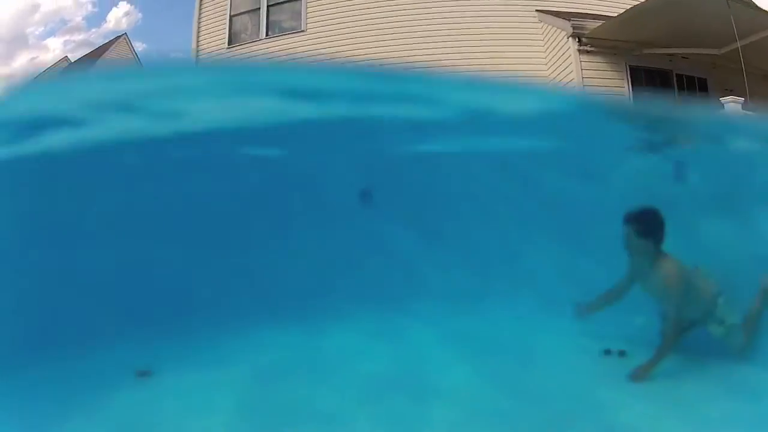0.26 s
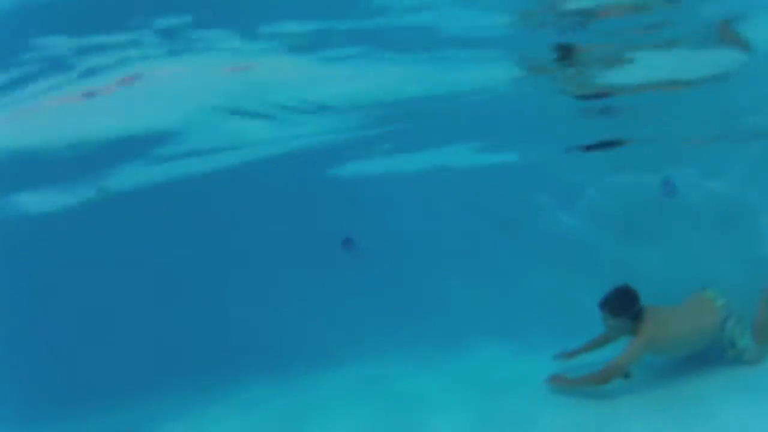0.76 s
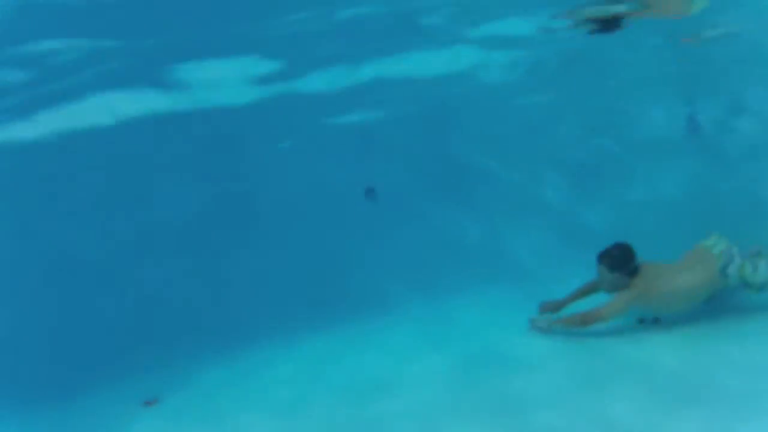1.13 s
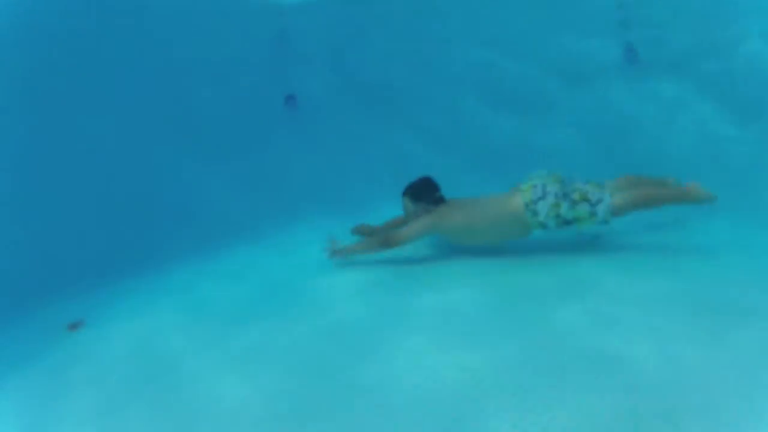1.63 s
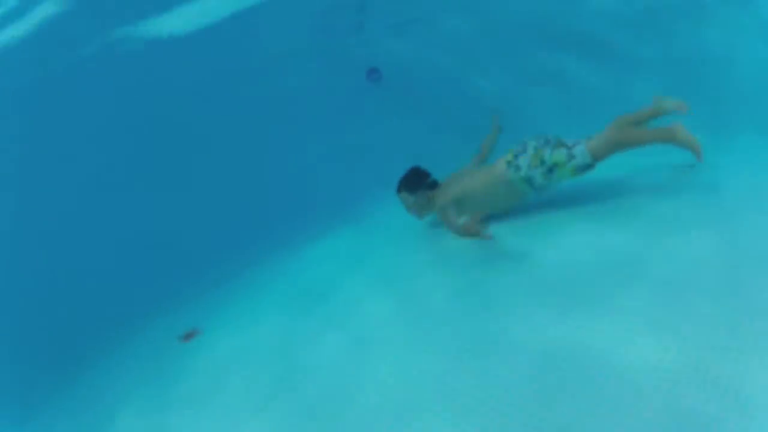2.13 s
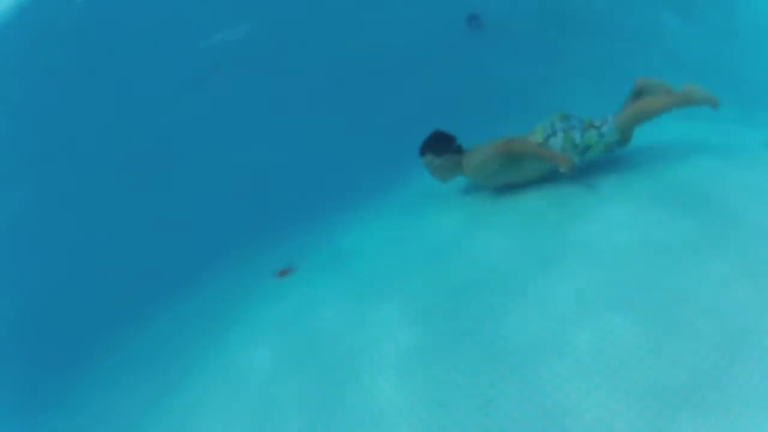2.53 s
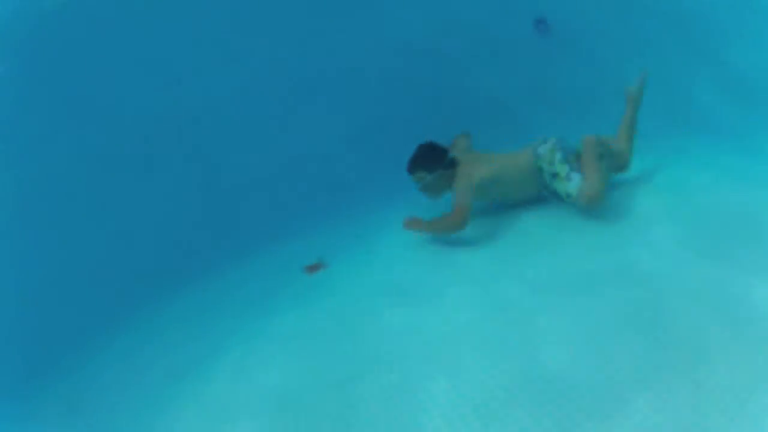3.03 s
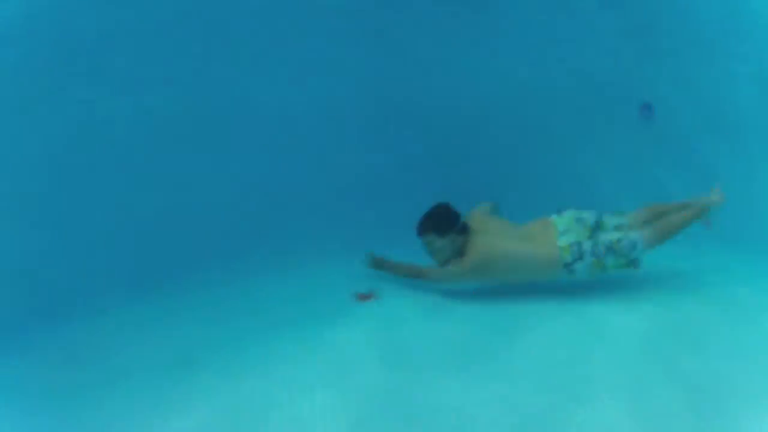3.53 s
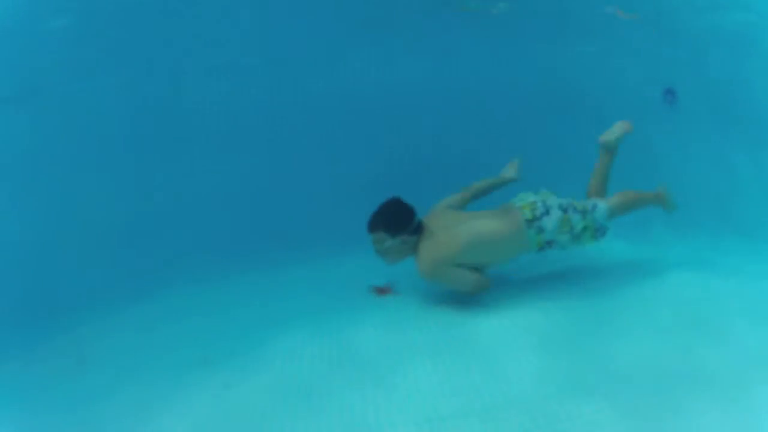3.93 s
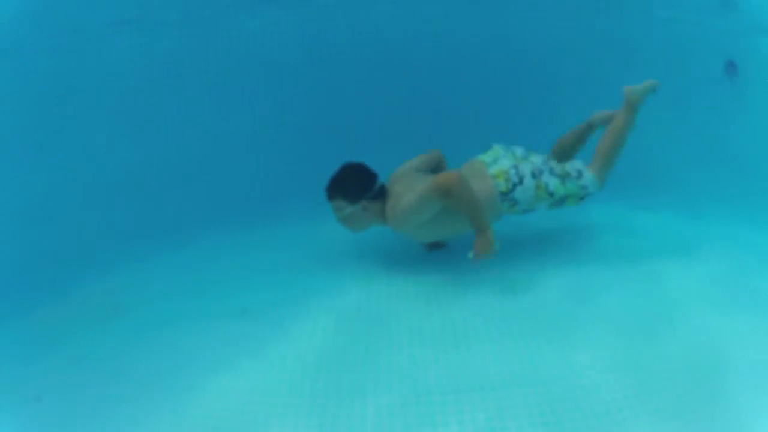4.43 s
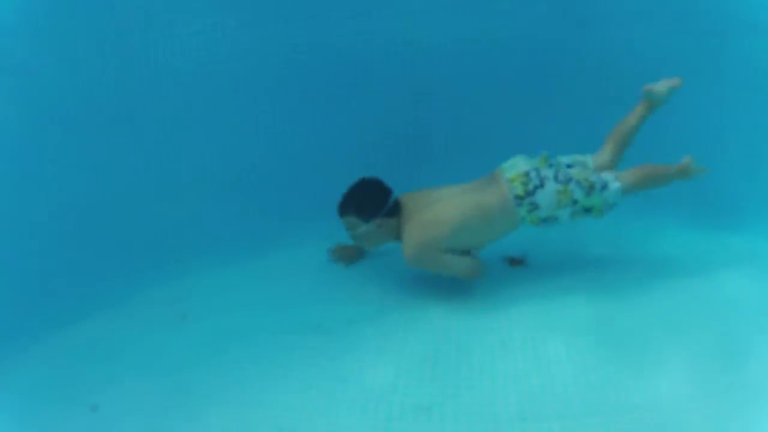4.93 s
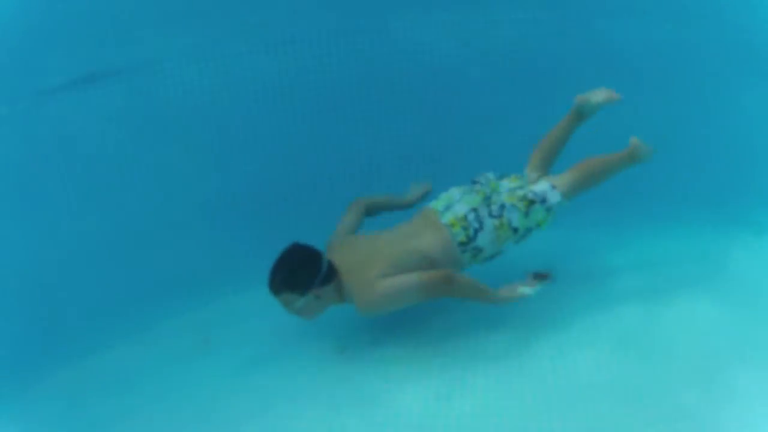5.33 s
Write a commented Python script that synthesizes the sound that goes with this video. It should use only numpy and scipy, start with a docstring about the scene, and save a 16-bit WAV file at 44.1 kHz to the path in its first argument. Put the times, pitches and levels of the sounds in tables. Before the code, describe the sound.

A brief, sharp slosh and gurgle of going under, followed by quiet, muffled pool water with soft fizzing and scattered ticks.

```python
"""Water slaps a sealed camera housing as it dips into a garden pool; trapped air gulps out and waves
thump the wall. Once under, far bubbles arrive faint, and swimmers' splashes and churned water ring the
housing, all with a short pool echo, over a low surge and a steady hush. Each sample is held as a step
at 12 kHz, so mirror images of the sound fill the treble."""
import sys
import numpy as np
from scipy import signal
from scipy.fft import rfft, irfft
from scipy.io import wavfile
from scipy.ndimage import uniform_filter1d

SR = 44100
rng = np.random.default_rng(int(sys.argv[2]) if len(sys.argv) > 2 else 0)


def to_wav(s):
    """Save 16-bit WAV."""
    ch = np.atleast_2d(s).T  # columns
    pcm = np.round(np.clip(ch, -1, 1) * 32767)  # PCM
    wavfile.write(sys.argv[1], SR, pcm.astype(np.int16))


N = 246078


def undb(db):
    return 10 ** (np.asarray(db) / 20)


def unit(x):
    return x / np.sqrt(np.mean(x ** 2))


def fade(t, t60_s):
    return np.exp(-np.log(1000) * t / max(t60_s, .002))


def band(x, hz, width_hz):
    """One resonance, gain 1 at its centre."""
    return signal.lfilter(*signal.iirpeak(hz, hz / width_hz, fs=SR), x)


def add(out, start_s, x):
    i = int(start_s * SR)
    out[i:i + len(x)] += x[:N - i]


def wander(samples):
    """Twice-smoothed noise, RMS 1."""
    return unit(uniform_filter1d(uniform_filter1d(rng.standard_normal(N), samples), samples))


def slaps(relative_width=0.22, attack_s=0.00086, t60_s=.013):
    """Water hits the housing: short dry cracks of band noise."""
    # hits: t/s, level/dB, centre f/Hz
    hits = [(0.0895, -30.5, 2300), (0.1041, -21, 1670), (0.1173, -20.5, 2030), (0.13, -24.5, 1760),
            (0.1445, -19, 2760), (0.159, -28, 3580), (0.2127, -41, 3260), (0.227, -36, 2230),
            (0.272, -35, 2460), (0.2904, -22.5, 2330), (0.4016, -21.5, 1820), (0.434, -35.5, 1830),
            (0.4703, -36, 1550), (0.5507, -27, 1500), (0.556, -4.5, 1390), (0.567, -25.5, 1640),
            (0.6146, -37, 2220), (0.6444, -19, 1410), (0.6805, -41, 1550), (0.705, -29.5, 2360),
            (0.7095, 2.5, 2570), (0.724, -16, 1995), (0.7376, -15.5, 5250), (0.7407, 4, 5247),
            (0.755, -11.5, 2100), (0.7594, -19.5, 2600), (0.7787, -4, 1730), (0.783, -9, 2030),
            (0.7908, -9, 1960), (0.801, -23.5, 1980), (0.8164, -25, 1500), (0.878, -20, 1440)]
    out, t = np.zeros(N), np.arange(2000) / SR
    for s, db, hz in hits:
        crack = unit(band(rng.standard_normal(len(t)), hz, relative_width * hz))
        add(out, s, undb(db) * crack * fade(t, t60_s) * np.minimum(t / attack_s, 1))
    return out


def bubble(hz, t60_s, rise_s, glide=0.013):
    """A tone that swells, dies away and climbs a little as the bubble rises."""
    t = np.arange(int((t60_s + rise_s) * SR)) / SR
    swell = np.sin(np.pi / 2 * np.minimum(t / rise_s, 1)) ** 2
    tone = np.sin(2 * np.pi * hz * t * (1 + glide * t / t60_s))
    return tone * swell * fade(np.maximum(t - rise_s, 0), t60_s)


def bubbles(under_s=.95, near_rise_cycles=1.3, octave_db=-22, far_rise_s=0.0029, waver_s=0.0039):
    """Air pinches off: sharp near bubbles in the dip, then soft far clusters, small ones most blurred."""
    # pinch-offs: t/s, level/dB, f/Hz, t60/s
    pinch_offs = [(0.085, -41.5, 2170, 0.14), (0.108, 1.5, 696, 0.018), (0.118, -28, 576, 0.073),
                  (0.13, -25, 2000, 0.016), (0.145, -41, 2800, 0.0093), (0.147, -25, 1680, 0.0065),
                  (0.159, -20, 2920, 0.0059), (0.16, -14.5, 3740, 0.011), (0.226, -14, 603, 0.015),
                  (0.264, -34, 430, 0.0072), (0.2944, -19, 2340, 0.0099), (0.3635, -42, 2450, 0.036),
                  (0.379, -34.5, 764, 0.14), (0.401, -25.5, 620, 0.016), (0.399, -11.5, 2000, 0.0028),
                  (0.4375, -48, 746, 0.28), (0.482, -31, 696, 0.055), (0.524, -42, 1080, 0.04),
                  (0.558, 2.5, 1310, 0.0024), (0.568, -27.5, 506, 0.045), (0.558, -1.5, 541, 0.013),
                  (0.6443, -8, 721, 0.07), (0.6469, -1, 1463, 0.017), (0.697, -21, 705, 0.024),
                  (0.71, 0, 2560, 0.0067), (0.7077, -23, 1620, 0.012), (0.717, -22, 688, 0.043),
                  (0.724, -13.5, 1695, 0.018), (0.723, -10, 2200, 0.018), (0.738, -19, 1344, 0.024),
                  (0.737, -22, 550, 0.011), (0.7536, -17, 3836, 0.011), (0.754, -16.5, 2126, 0.033),
                  (0.768, -15.5, 674, 0.032), (0.771, -11, 2680, 0.015), (0.787, -14, 1914, 0.021),
                  (0.789, -10, 1290, 0.033), (0.7908, -8.5, 558, 0.028), (0.792, -8, 3900, 0.011),
                  (0.82, -6.5, 1300, 0.015), (0.838, -37.5, 1900, 0.034), (0.879, -31, 2440, 0.0086),
                  (0.8875, -23, 1310, 0.04), (1.016, -35.5, 1815, 0.0094), (1.0141, -34.5, 1050, 0.0097),
                  (1.065, -36.5, 1060, 0.0057), (1.12, -40, 2005, 0.06), (1.1868, -44, 1330, 0.025),
                  (1.358, -48, 1190, 0.059), (1.41, -36.5, 1347, 0.0085), (1.448, -45, 2860, 0.011),
                  (1.474, -46, 2090, 0.01), (1.5587, -37.5, 2530, 0.011), (1.661, -48, 2576, 0.029),
                  (1.784, -47.5, 1954, 0.031), (1.962, -35, 3316, 0.0085), (1.965, -36, 1130, 0.031),
                  (2.03, -48.5, 2850, 0.016), (2.06, -39.5, 1087, 0.065), (2.0733, -37, 1060, 0.049),
                  (2.206, -45.5, 1990, 0.012), (2.2075, -41, 3640, 0.014), (2.234, -44, 1820, 0.05),
                  (2.237, -37, 2994, 0.033), (2.239, -30.5, 1070, 0.037), (2.434, -47, 1050, 0.026),
                  (2.44, -46.5, 3910, 0.03), (2.518, -48.5, 1058, 0.04), (2.5641, -44.5, 3490, 0.03),
                  (2.74, -46.5, 3230, 0.042), (2.835, -51, 3070, 0.024), (2.964, -46.5, 1344, 0.01),
                  (3.0492, -51, 3530, 0.045), (3.094, -49, 1960, 0.03), (3.1987, -35, 3560, 0.01),
                  (3.2182, -45.5, 945, 0.018), (3.331, -46, 3910, 0.01), (3.365, -40.5, 3690, 0.0098),
                  (3.4168, -38, 3560, 0.038), (3.432, -34, 3990, 0.012), (3.45, -40.5, 970, 0.016),
                  (3.452, -42, 1746, 0.05), (3.4715, -44, 2056, 0.08), (3.486, -38.5, 2055, 0.022),
                  (3.4976, -43.5, 960, 0.013), (3.504, -43.5, 3900, 0.011), (3.5556, -40.5, 1880, 0.018),
                  (3.57, -46, 1073, 0.052), (3.576, -41, 3840, 0.0079), (3.72, -52.5, 1753, 0.035),
                  (3.786, -41.5, 3900, 0.025), (3.878, -48.5, 1050, 0.064), (3.9673, -36.5, 995, 0.033),
                  (3.935, -52.5, 3650, 0.025), (4.016, -46.5, 2040, 0.016), (4.0632, -44.5, 2756, 0.021),
                  (4.092, -35, 1758, 0.045), (4.119, -43.5, 3850, 0.01), (4.132, -45, 2050, 0.039),
                  (4.2196, -44.5, 960, 0.063), (4.248, -42.5, 501, 0.021), (4.367, -53.5, 3616, 0.015),
                  (4.4206, -44.5, 3636, 0.012), (4.542, -47, 3100, 0.045), (4.5407, -39.5, 1784, 0.03),
                  (4.644, -51, 3620, 0.032), (4.721, -50.5, 1079, 0.02), (5.0036, -44.5, 968, 0.039),
                  (5.328, -39.5, 1056, 0.011), (5.334, -47.5, 2540, 0.026), (5.4306, -36.5, 1730, 0.013),
                  (5.435, -40.5, 2577, 0.043), (5.455, -43, 2544, 0.05), (5.478, -43, 2000, 0.066),
                  (5.489, -40, 1170, 0.017), (5.497, -48, 699, 0.082), (5.516, -45.5, 3230, 0.029),
                  (5.525, -45.5, 3670, 0.023), (5.539, -48.5, 425, 0.049), (5.553, -48, 790, 0.11),
                  (5.56, -51.5, 3640, 0.0086), (5.5635, -45, 4260, 0.043), (5.57, -47, 1940, 0.033)]
    near, far = np.zeros(N), np.zeros(N)
    waver = wander(int(waver_s * SR))
    for s, db, hz, t60_s in pinch_offs:
        if s < under_s:
            rise_s = near_rise_cycles / hz
            add(near, s, undb(db) * bubble(hz, t60_s, rise_s))
            if hz < 900:  # large bubbles ring a weak octave too
                add(near, s, undb(db + octave_db) * bubble(2 * hz, t60_s, rise_s))
        else:
            tone = bubble(hz, t60_s, far_rise_s)
            blur = 1 + hz / 2000 * np.roll(waver, -int(s * SR + hz))[:len(tone)]
            tone_rms = np.sqrt(np.mean(tone ** 2))
            add(far, s, undb(db) * tone_rms * unit(tone * blur))
    return near, far


def thumps():
    """Waves shove the housing; its wall swings briefly."""
    # shoves: t/s, level/dB, f/Hz, t60/s
    shoves = [(0.107, -32.5, 148, 0.015), (0.225, -27, 148, 0.011), (.4, -38, 122, 0.026),
              (0.432, -41, 89, 0.044), (.557, -10.5, 182, 0.0087), (0.644, -21.5, 198, 0.025),
              (0.7, -38.5, 153, 0.025), (0.709, -11.5, 134, 0.01), (0.741, -28.5, 148.5, 0.024),
              (0.79, -29, 118.6, 0.02), (1.058, -45, 45, 0.11), (1.08, -42, 224, 0.054),
              (4.22, -47.5, 35, 0.17), (4.247, -48.5, 197, 0.046)]
    out = np.zeros(N)
    for s, db, hz, t60_s in shoves:
        add(out, s, undb(db) * bubble(hz, t60_s, rise_s=0.5 / hz))
    return out


def housing(x, tilt_db_oct, direct_db=-14):
    """The walls pass sound mostly at their resonances."""
    # wall modes: f/Hz, width/Hz, level/dB
    modes = [(1093, 130, -6.5), (1850, 330, -5), (2824, 150, -9.5), (3110, 100, -6.5), (3712, 150, -4),
             (5350, 500, -12.5)]
    ring = sum((-1) ** k * undb(db + tilt_db_oct * np.log2(hz / 2000)) * band(x, hz, width_hz)
               for k, (hz, width_hz, db) in enumerate(modes))
    return ring + undb(direct_db) * band(x, hz=3600, width_hz=4000)


def splashes():
    """Splashes across the pool: sharp, decaying noise bursts that ring the housing."""
    # bursts: t/s, level/dB, t60/s, tilt/(dB/oct)
    bursts = [(1.4501, -48.5, 0.042, -14.5), (1.5567, -46.5, 0.043, 6), (1.6583, -55.5, 0.036, -1),
              (1.9621, -49.5, 0.042, -3.5), (2.0303, -57.5, 0.045, 1), (2.2069, -48.5, 0.029, -4),
              (2.3297, -38, 0.024, -0.5), (2.4364, -48.5, 0.032, -2.5), (2.5645, -54, 0.03, -2.5),
              (2.6568, -50, 0.045, -6), (2.9009, -33.5, 0.083, 6.5), (3.1866, -32, 0.033, 0.5),
              (3.2992, -47.5, 0.07, 0.5), (3.4286, -42, 0.027, 8), (3.7647, -29, 0.037, -0.5),
              (4.0667, -48, 0.044, 9.5), (4.4218, -50.5, 0.035, -0.5), (5.0903, -54.5, 0.029, 3),
              (5.148, -29.5, 0.021, 2.5), (5.335, -49.5, 0.055, -0.5)]
    out, t = np.zeros(N), np.arange(8000) / SR
    for s, db, t60_s, tilt_db_oct in bursts:
        noise = rng.standard_normal(len(t))
        steady_rms = np.sqrt(np.mean(housing(noise, tilt_db_oct) ** 2))
        add(out, s, undb(db) * housing(noise * fade(t, t60_s), tilt_db_oct) / steady_rms)
    return out


def swirls(attack_s=0.035, t60_s=0.083, calm_db=-73, calm_hz=2000):
    """Gain and bubble pitch of swirls that rise, hold and die over calm water; the strongest leads."""
    # swirls: t/s, hold/s, level/dB, typical bubble f/Hz
    eddies = [(.08, .11, -49.5, 2018), (.19, .06, -53.5, 2400), (.27, .08, -54.5, 2600),
              (0.363, .07, -53.5, 2000), (0.462, .07, -56, 1800), (0.591, .02, -58, 2232),
              (0.688, .03, -39.5, 1502), (.75, 0.041, -33.5, 2205), (1.021, .08, -63, 1300),
              (1.3, .12, -62, 1414), (1.426, .11, -59, 3300), (1.56, .04, -61, 3300),
              (1.621, .05, -63, 2406), (1.736, .1, -64.5, 2198), (1.959, .12, -65.5, 1597),
              (2.2, .07, -58.5, 2321), (2.408, .06, -61.5, 2500), (2.5, 0.1, -62.5, 2554),
              (2.637, .2, -61, 3000), (3.027, .12, -58, 2271), (3.288, .14, -55, 3800),
              (3.451, .06, -55.5, 3800), (3.548, .07, -57, 3600), (3.637, .08, -65.5, 1600),
              (3.871, .14, -68, 1302), (4.058, .11, -55, 3000), (4.196, .05, -64.5, 1723),
              (4.386, .06, -65, 1800), (4.63, .13, -61.5, 2593), (4.88, .09, -67, 2211),
              (5.037, .08, -67.5, 1600), (5.331, .06, -59, 1700), (5.42, .06, -54, 1808),
              (5.492, .1, -52, 2587)]
    t = np.arange(N) / SR
    power = np.full(N, undb(calm_db) ** 2)
    weighted_log_hz = power * np.log(calm_hz)
    for s, hold_s, db, hz in eddies:
        envelope = np.clip((t - s) / attack_s, 0, 1) * fade(np.maximum(t - s - hold_s, 0), t60_s)
        swirl_power = (undb(db) * envelope) ** 2
        power += swirl_power
        weighted_log_hz += swirl_power * np.log(hz)
    return np.sqrt(power), np.exp(weighted_log_hz / power)


def churn(count=7000, spread_oct=1.3, hiss_db=-1, flicker_db=5.5, gurgle_db=-4):
    """Churned water through the housing: flickering fizz and hiss, plus a few longer bubbles."""
    gain, centre_hz = swirls()
    fizz, gurgle = np.zeros(N), np.zeros(N)
    for k, (when, weakness, down, up) in enumerate(rng.random((count, 4))):
        s = when * N / SR
        hz = np.clip(centre_hz[int(when * N)] * 2 ** (spread_oct * (up - down)), 600, 5500)
        if k % 16:
            add(fizz, s, undb(-16 * weakness) * bubble(hz, t60_s=.01, rise_s=0.00072))
        else:
            add(gurgle, s, undb(-12 * weakness) * bubble(hz, t60_s=0.1, rise_s=0.0062))
    flicker = undb(flicker_db * unit(uniform_filter1d(rng.standard_normal(N), size=500)))
    hiss = undb(hiss_db + 3.0 * np.log2(centre_hz / 2000)) * rng.standard_normal(N)
    water = unit(flicker * (unit(fizz) + hiss) + undb(gurgle_db) * unit(gurgle))
    return gain * unit(housing(water, tilt_db_oct=-1.4))


def pool(x, t60_s=0.051, onset_s=0.009, echo_db=-7):
    """Walls, floor and surface return a short dense tail."""
    t = np.arange(SR // 5) / SR
    tail = rng.standard_normal(len(t)) * fade(t, t60_s) * np.minimum(t / onset_s, 1)
    tail /= np.sqrt(np.sum(tail ** 2))
    return x + undb(echo_db) * signal.fftconvolve(x, tail)[:N]


def surge(band_hz=(22, 260), swell_db=2.5):
    """Water rumbles round the housing, swelling a few times a second; rough in the dip, then even."""
    # rumble contour: t/s, level/dB
    contour = [(0.0, -76), (0.1, -50.5), (0.2, -50.5), (0.6, -58), (0.7, -41), (0.8, -50.5), (1.0, -61),
               (1.1, -49), (1.2, -63.5), (3.1, -64), (4.3, -63.5), (5.6, -62)]
    level_db = np.interp(np.arange(N) / SR, *np.transpose(contour))
    bandpass = signal.butter(2, band_hz, "bandpass", fs=SR, output="sos")
    rumble = signal.sosfilt(bandpass, rng.standard_normal(N))
    swell = undb(swell_db * wander(samples=3000))
    return undb(level_db) * unit(rumble * swell)


def hush(level_db=-61.5):
    """Steady noise of the water and the microphone."""
    # noise spectrum: f/Hz, relative level/dB
    spectrum = [(15, -13.5), (25, 4), (210, -3.5), (807, -13.5), (1040, -13.5), (1500, -17.5), (1970, -18),
                (2310, -28), (3570, -18.5), (5140, -23.5), (5900, -26), (7670, -55.5), (13000, -120)]
    knot_hz, knot_db = np.transpose(spectrum)
    hz = np.arange(N // 2 + 1) * SR / N + 1
    shape = undb(np.interp(np.log(hz), np.log(knot_hz), knot_db))
    return undb(level_db) * unit(irfft(rfft(rng.standard_normal(N)) * shape, N))


def scene():
    """Mono: near sounds dry, far sounds with the pool's echo."""
    near, far = bubbles()
    return (near + slaps() + thumps() + pool(far + splashes() + churn()) + surge() + hush())[None]


def lowpass(x, hz, order, ripple_db, stop_db):
    return signal.sosfilt(signal.ellip(order, ripple_db, stop_db, hz, fs=SR, output="sos"), x)


def record(dry, clip_level=.76, hold_hz=12000):
    """Clip, band-limit, hold each sample of the low rate as a step, then cut the top."""
    x = lowpass(np.clip(dry, -clip_level, clip_level), hz=5750, order=6, ripple_db=.3, stop_db=40)
    low_rate = signal.resample_poly(x, hold_hz, SR, axis=1)
    steps = np.repeat(low_rate, 4, axis=1)
    steps = signal.resample_poly(steps, SR, 4 * hold_hz, axis=1)[:, :N]
    steps = lowpass(steps, hz=15150, order=5, ripple_db=.3, stop_db=26)
    return lowpass(steps, hz=16494, order=10, ripple_db=.2, stop_db=70)


dry = scene()
out = record(dry)
to_wav(out)
```